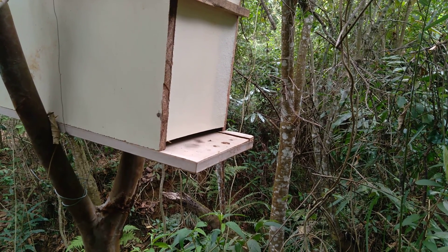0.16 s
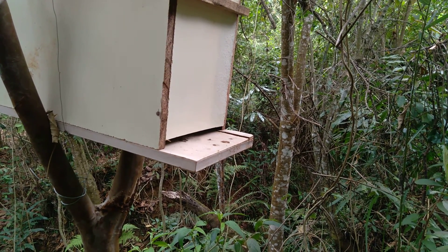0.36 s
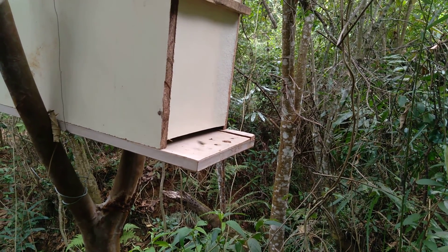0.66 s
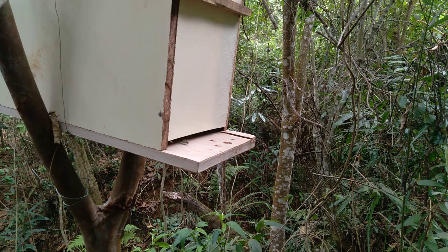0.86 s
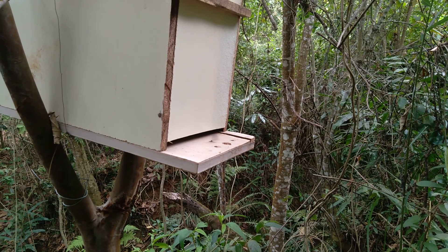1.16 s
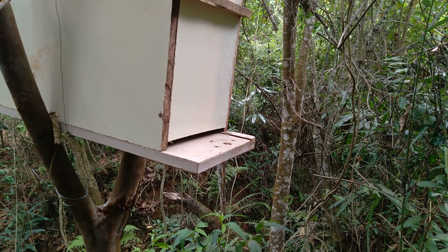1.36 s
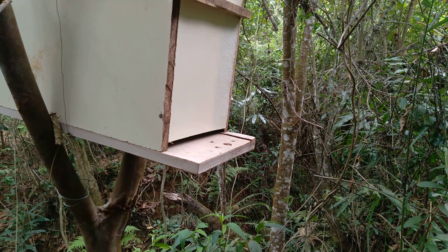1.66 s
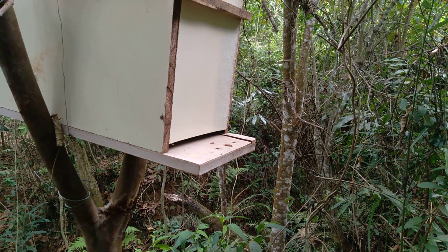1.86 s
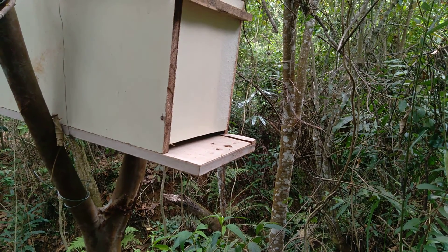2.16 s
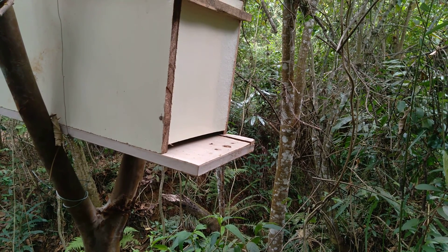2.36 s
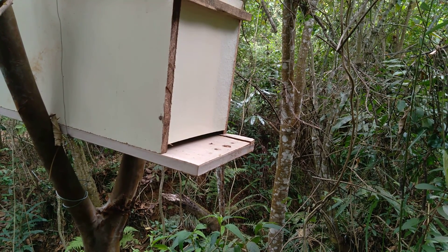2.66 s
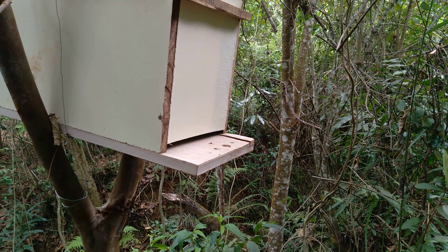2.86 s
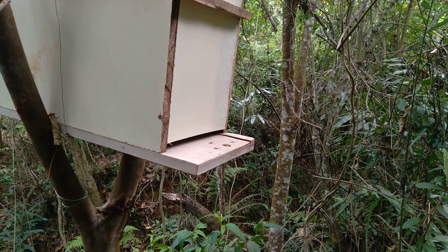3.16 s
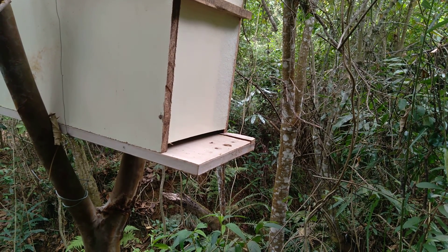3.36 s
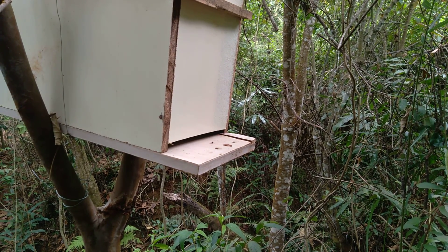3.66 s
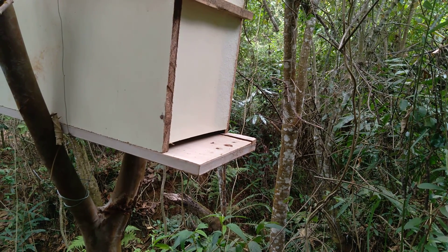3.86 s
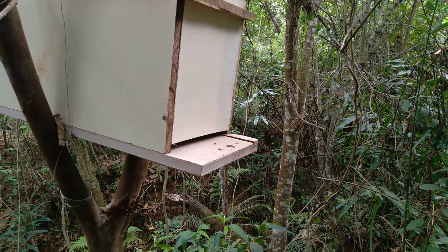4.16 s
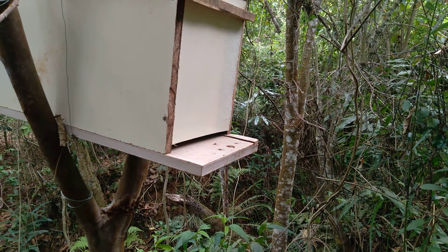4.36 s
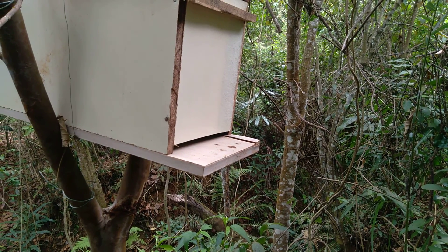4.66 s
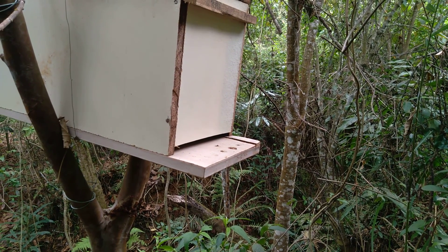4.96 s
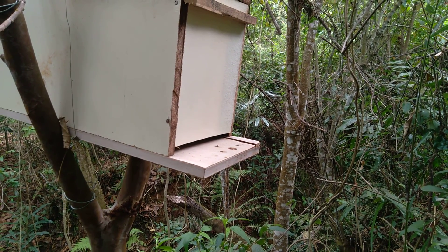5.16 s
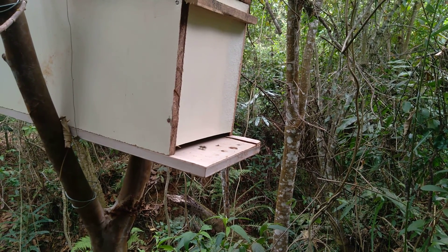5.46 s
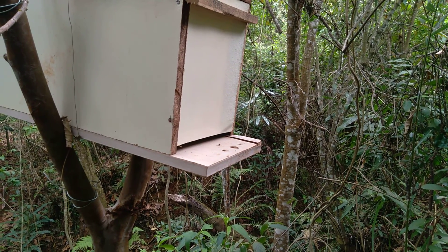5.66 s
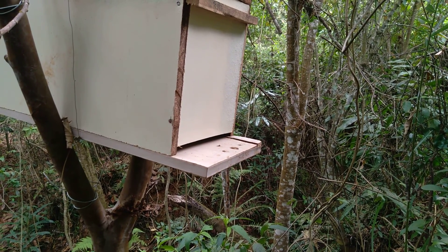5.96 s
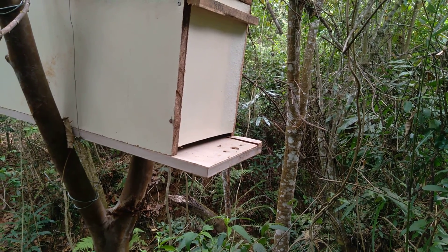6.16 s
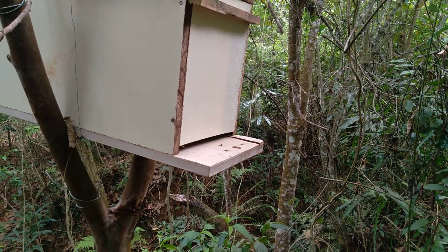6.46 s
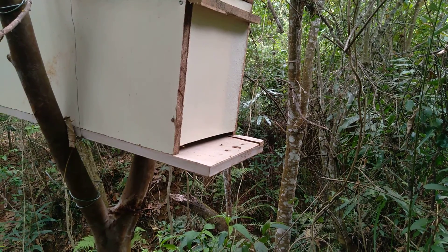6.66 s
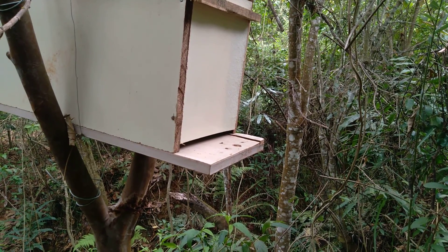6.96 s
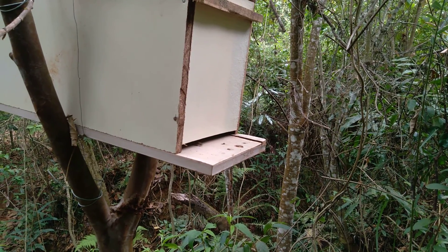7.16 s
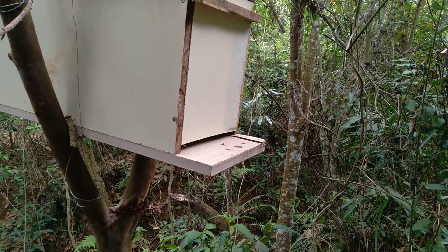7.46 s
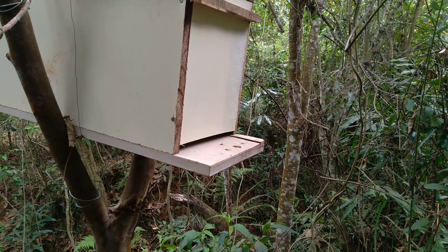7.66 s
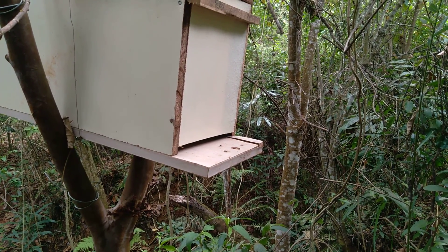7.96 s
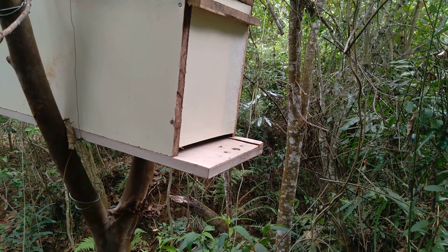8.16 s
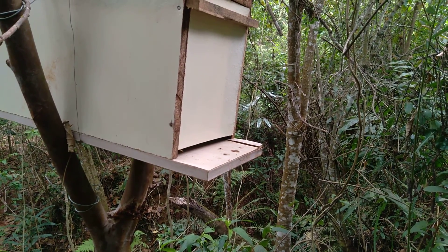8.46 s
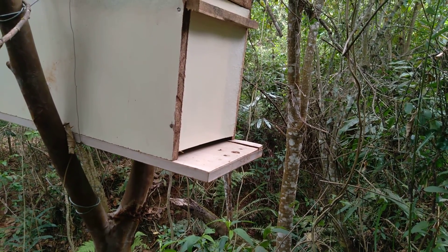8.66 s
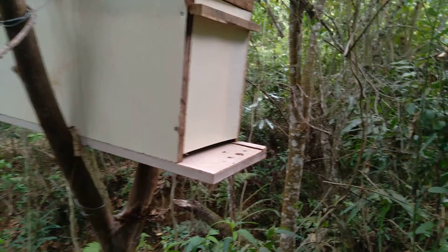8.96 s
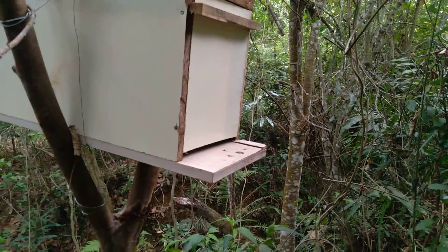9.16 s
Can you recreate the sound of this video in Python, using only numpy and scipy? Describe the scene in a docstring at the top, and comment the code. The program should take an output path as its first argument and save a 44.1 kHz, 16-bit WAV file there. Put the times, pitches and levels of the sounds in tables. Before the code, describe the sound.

Cicadas shrill in a dense, throbbing metallic chorus in woodland, with harsh rasping bursts, a faint low insect hum and tiny drip-like pips.

```python
"""Cicadas shrill in dense woodland around a beehive: tymbal click trains ring body resonances.
One near singer throbs on a steady beat, a higher one ends on a held note, a lower one flexes irregularly.
A far chorus swells behind held notes; rasping calls, bursts of rib clicks, glide up and break in.
Below lie a coloured-noise hum with wingbeats, rounded sine pips like drips, and gliding bird notes.
Filtered noise makes the air, rustles, knocks, a late whine and stuttering phrases."""
import sys
import numpy as np
from scipy import signal
from scipy.fft import rfft, irfft, next_fast_len
from scipy.io import wavfile
from scipy.ndimage import uniform_filter1d

SR = 44100
rng = np.random.default_rng(int(sys.argv[2]) if len(sys.argv) > 2 else 0)


def bounce(signal):
    """Save signal as a 16-bit WAV file at the path given by the first command-line argument."""
    frames = np.transpose(np.atleast_2d(signal))
    limited = np.clip(frames, -1, 1)
    pcm = np.round(limited * 32767).astype(np.int16)
    wavfile.write(sys.argv[1], SR, pcm)


N = 411453
T = np.arange(N) / SR
# Table levels are before the gain_db of the function that plays them.


def from_db(db):
    """Decibels to amplitude gain."""
    return np.exp(np.asarray(db) * (np.log(10) / 20))


def rms_one(x):
    """Scale to rms 1."""
    return x / np.sqrt(np.mean(np.abs(x) ** 2) + 1e-20)


def in_time(rows):
    """Interpolate each column of a curve, sample by sample."""
    s, *columns = np.transpose(rows)
    return [np.interp(T, s, c) for c in columns]


def during(rows):
    """A soft-edged gate, open while a curve lasts."""
    is_open = (T >= rows[0][0]) & (T <= rows[-1][0] + .02)
    return uniform_filter1d(1.0 * is_open, size=2500)


def drift(rate_hz, size=N):
    """Slow random wander of spread 1, linear between knots."""
    knots = rng.standard_normal(int(rate_hz * size / SR) + 4)
    return np.interp(T[:size] * rate_hz, np.arange(len(knots)), rms_one(knots))


def coloured(x, spectrum):
    """Weight a steady sound by a spectrum; rms 1."""
    hz, db = np.transpose(spectrum)
    size = next_fast_len(N)
    log_f = np.log(np.arange(size // 2 + 1) * SR / size + 1e-3)
    weight_db = np.interp(log_f, np.log(hz), db, left=-90, right=-90)
    return rms_one(irfft(rfft(x, size) * from_db(weight_db), size)[:N])


def noise(spectrum):
    """Steady noise of a given colour."""
    return coloured(rng.standard_normal(N), spectrum)


def tymbal(rate_hz, wander, uneven_db, polarity=1, size=N):
    """One click per buckling; with polarity -1 the in and out strokes have opposite signs."""
    step = rate_hz * (1 + wander * drift(25, size=size)) / SR
    turns = np.cumsum(step) + rng.random()
    at = np.flatnonzero(np.diff(np.floor(turns))) + 1
    late = turns[at] % 1 / step[at]  # sub-sample timing
    strength = from_db(uneven_db * rng.uniform(-2.75, 1, size)[at])
    strength = strength * np.sign(polarity) ** np.arange(len(at))
    clicks = np.zeros(size)
    clicks[at - 1], clicks[at] = strength * late, strength * (1 - late)
    return clicks


def body(clicks, hz, width_hz, order=3):
    """A resonance whose centre may move; complex, so that its square is its overtone."""
    carrier = np.exp(2j * np.pi * np.cumsum(hz + np.zeros(len(clicks))) / SR)
    lowpass = signal.butter(order, width_hz / 2, fs=SR, output="sos")
    return signal.sosfilt(lowpass, clicks * carrier.conj() + 1e-18) * carrier


def song(clicks, modes):
    """Clicks ring the resonances of a hollow abdomen."""
    return sum(from_db(db) * body(clicks, hz, width_hz).real for hz, width_hz, db in modes)


def foliage(x, wet_db, t60=0.45):
    """Trunks and leaves scatter a sound into a short dense tail."""
    t = T[:SR // 2]
    tail = rng.standard_normal(len(t)) * from_db(-60 * t / t60) * (t > .004)
    return x + from_db(wet_db) * signal.oaconvolve(x, tail / np.linalg.norm(tail))[:len(x)]


def patchy(x, spread_db, size):
    """Neighbouring pitches fade in and out together, in patches some frequency bins tall; rms 1."""
    spectra = signal.stft(x, nperseg=1024)[2]
    field = rng.standard_normal(spectra.shape)
    for _ in range(2):
        field = uniform_filter1d(uniform_filter1d(field, size=6, axis=1), size=size, axis=0)
    patch_gain = from_db(spread_db * np.minimum(rms_one(field), 1))
    return rms_one(signal.istft(spectra * patch_gain, nperseg=1024)[1][:N])


def slack(first_s, beat_s, snap, duty):
    """How far a throbbing singer has relaxed: near 0 for a share of each beat, then quickly near 1."""
    beat = np.cos(2 * np.pi * (T - first_s) / beat_s)
    return .5 - .5 * np.tanh(snap * (beat - np.cos(np.pi * duty)))


def flexes(rows, half_s):
    """A rounded swell for each throb, and the time from the nearest crest (0 between throbs)."""
    s, db = np.transpose(rows)
    nearest = np.searchsorted((s[1:] + s[:-1]) / 2, T)
    since = T - s[nearest]
    swell = uniform_filter1d(from_db(db[nearest]) * np.exp(-.5 * (since / half_s) ** 2), size=500)
    return swell, uniform_filter1d(since * (np.abs(since) < 2 * half_s), size=1500)


# Throb: t/s, crest level/dB, depth/dB
LEAD_THROB = [(0, -45, -3), (.33, -34, 7.5), (.5, -37.5, 5.5), (.85, -34.5, 10.5), (1.05, -37.5, 5),
              (1.8, -34.5, 7), (4.9, -33, 5.5), (6.1, -30.5, 5), (7.6, -31.5, 2), (8.0, -41.5, -5.5),
              (8.55, -41, -6.5), (9.0, -33, -3)]
# Abdomen resonances: f/Hz, width/Hz, level/dB
LEAD_MODES = [(3893, 356, -7.5), (4566, 425, 6), (5104, 190, 0.5), (5310, 120, -4), (5705, 330, -15.5),
              (6305, 70, -9), (7045, 200, -7), (7855, 370, -3)]
# Tymbal speed, slowing a little as it tires: t/s, clicks/Hz
LEAD_CLICK_RATE = [(0, 251.8), (6.0, 252.0), (7.3, 251.5), (8.8, 250.9)]
# Deep resonance opening in stronger throbs: t/s, level/dB
LEAD_DEEP_OPENINGS = [(.28, -51), (.65, -47), (1.02, -55), (1.43, -45.5), (1.83, -46), (2.17, -54),
                      (2.53, -54), (2.64, -47), (2.95, -59), (3.42, -50.5), (3.91, -51), (4.13, -47),
                      (4.38, -51), (4.6, -47), (4.82, -49), (5.04, -48), (5.41, -49), (5.72, -51),
                      (6.18, -49), (6.5, -51), (7.25, -48), (7.44, -49)]
LEAD_FIRST_S, LEAD_BEAT_S = .22, .395


def lead_cicada(gain_db=0.3, snap=3.2, duty=0.43, deep_hz=3545, deep_width_hz=150, deep_half_s=.04):
    """A clean, close, throbbing buzz on a steady beat; a deep resonance opens in the stronger throbs."""
    crest_db, depth_db = in_time(LEAD_THROB)
    rate_hz, = in_time(LEAD_CLICK_RATE)
    sag_db = depth_db * slack(LEAD_FIRST_S, LEAD_BEAT_S, snap, duty)
    clicks = tymbal(rate_hz, wander=.003, uneven_db=2.2)
    buzz = patchy(foliage(song(clicks, LEAD_MODES), wet_db=-11), spread_db=2.5, size=6)
    deep_clicks = tymbal(rate_hz, wander=0.012, uneven_db=2.5)
    deep = rms_one(body(deep_clicks, deep_hz, deep_width_hz, order=4).real)
    opening, _ = flexes(LEAD_DEEP_OPENINGS, deep_half_s)
    return from_db(crest_db + gain_db - sag_db) * buzz + opening * deep


# Held note, at last without a break: t/s, level/dB
HIGH_HELD = [(0, -58), (2.4, -52), (4.5, -50), (5.6, -42), (5.9, -37), (6.3, -36.5), (7.1, -34),
             (7.5, -36.5), (7.8, -34), (8.2, -33), (9.33, -33)]
# Abdomen resonances: f/Hz, width/Hz, level/dB
HIGH_MODES = [(6595, 440, -1), (7080, 140, -2), (7440, 280, 1), (7570, 170, 1), (8010, 210, 3),
              (8278, 98, -5.5)]
# Throbs: t/s, level/dB
HIGH_FLEXES = [(.02, -38.5), (.24, -40), (.43, -39.5), (.64, -33), (.84, -27.5), (1.05, -32), (1.25, -33),
               (1.45, -37), (1.67, -39.5), (1.87, -38), (2.1, -36.5), (2.29, -33), (2.53, -38),
               (2.73, -37.5), (2.96, -36.5), (3.13, -40.5), (3.39, -39.5), (3.56, -39.5), (3.76, -39),
               (3.98, -43.5), (4.18, -38.5), (4.4, -39.5), (4.62, -35.5), (4.83, -38.5), (5.03, -38),
               (5.25, -37), (5.44, -37), (5.67, -39)]


def high_cicada(gain_db=-0.5, half_s=0.049, slide_hz_per_s=1200, stray_hz=70):
    """A smaller, faster singer clicks on both strokes; resonances stray and rise through each throb."""
    held_db, = in_time(HIGH_HELD)
    swell, since = flexes(HIGH_FLEXES, half_s)
    clicks = foliage(tymbal(290.3, wander=.0024, uneven_db=3.0, polarity=-1), wet_db=-4)
    slide_hz = slide_hz_per_s * since
    modes = [(hz + slide_hz + stray_hz * drift(9), width_hz, db) for hz, width_hz, db in HIGH_MODES]
    buzz = patchy(song(clicks, modes), spread_db=5.5, size=6)  # overtones flicker
    return from_db(gain_db) * np.hypot(swell, from_db(held_db)) * buzz


# Note held between flexes: t/s, level/dB, resonance f/Hz
LOW_NOTE = [(0, -63, 3900), (3.1, -50, 3930), (3.7, -38, 3920), (6.5, -42, 3794), (7.9, -42, 4160),
            (9.33, -46, 4150)]
# Flexes of the abdomen: t/s, level/dB
LOW_FLEXES = [(0.261, -31.5), (0.399, -31), (.66, -31), (.79, -36), (1.05, -32), (1.25, -37), (1.46, -30),
              (1.679, -28.5), (1.895, -29), (2.11, -38.5), (2.34, -29.5), (2.57, -28.5), (2.75, -32.5),
              (3.0, -34.5), (3.22, -35), (3.4, -32.5), (3.7, -35), (3.93, -36.5), (4.17, -29.5),
              (4.38, -35), (4.611, -32.5), (4.82, -37), (5.211, -32), (5.41, -26.5), (5.73, -32.5),
              (5.99, -32.5), (6.199, -29), (6.489, -33), (6.979, -38), (7.439, -32), (7.64, -31),
              (8.05, -27.5), (8.4, -42), (9.0, -27)]


def low_cicada(gain_db=-6.0, half_s=0.04, slide_hz_per_s=1000):
    """Each flex swells out of a held note, and the resonance slides up through it."""
    held_db, hz = in_time(LOW_NOTE)
    swell, since = flexes(LOW_FLEXES, half_s)
    clicks = foliage(tymbal(125.9, wander=0.007, uneven_db=5.5), wet_db=8)
    buzz = rms_one(body(clicks, hz + slide_hz_per_s * since, width_hz=367, order=4).real)
    return from_db(gain_db) * np.hypot(swell, from_db(held_db)) * buzz


# Middle-distance cicadas: start t/s, end t/s, clicks/Hz, resonance f/Hz, width/Hz, level/dB
HELD_SINGERS = [(0, .28, 250.2, 4660, 260, -36), (.98, 1.3, 250.5, 4770, 150, -41),
                (1.5, 3.6, 252.0, 5290, 110, -48), (2.8, 9.33, 248.0, 4400, 260, -45),
                (4.2, 7.8, 244.8, 3950, 200, -47), (6.2, 7.7, 253.9, 5200, 300, -42),
                (6.5, 9.33, 202.5, 4050, 450, -42), (7.7, 9.33, 222.6, 5060, 400, -38.5),
                (8.65, 9.33, 269.8, 4900, 420, -38), (6.7, 9.33, 239.2, 7180, 200, -41),
                (7.8, 9.33, 246.8, 7650, 600, -38)]


def held_notes(gain_db=-1.5, fade_s=0.099):
    """Steady tymbals ring narrow bodies, so each singer adds a few clean lines."""
    out = np.zeros(N)
    for start, end, rate_hz, hz, width_hz, db in HELD_SINGERS:
        gate = np.clip(np.minimum(T - start, end - T) / fade_s + 1, 0, 1)
        clicks = tymbal(rate_hz, wander=.0016, uneven_db=2)
        out += gate * from_db(db + gain_db) * rms_one(body(clicks, hz, width_hz, order=6).real)
    return out


# Swell: t/s, level/dB
CHORUS_SWELL = [(0, -52), (.85, -53), (1.4, -51), (2.0, -52), (3.3, -50.5), (5.5, -46.5), (7.2, -41),
                (8.0, -39), (8.5, -39), (9.0, -37)]
# Tymbal speed of each singer: clicks/Hz
CHORUS_CLICK_RATES = [235.5, 263.6, 288.0, 279.2, 230.5]
# Colour: f/Hz, level/dB per Hz
CHORUS_SPECTRUM = [(2600, -55), (3150, -38.5), (3500, -17.5), (3750, -7.5), (4300, -3), (4900, -0.5),
                   (5200, -1), (5450, -7), (5650, -1.5), (6000, -20.5), (6500, -11), (8000, -18.5),
                   (8700, -16), (9100, -42.5), (11500, -62)]


def chorus(gain_db=6.5):
    """Far singers, each at its own speed, blurred by the wood."""
    level_db, = in_time(CHORUS_SWELL)
    clicks = sum(tymbal(rate_hz, wander=.0023, uneven_db=3) for rate_hz in CHORUS_CLICK_RATES)
    blurred = coloured(foliage(clicks, wet_db=2.0), CHORUS_SPECTRUM)
    return from_db(level_db + gain_db) * patchy(blurred, spread_db=3.5, size=5)


def fading(x):
    """On many paths through the trees, narrow patches of the shrill cancel and return."""
    return np.std(x) * patchy(x, spread_db=2.2, size=4)


# Still air: f/Hz, level/dB per Hz
AIR_SPECTRUM = [(15, -41), (25, -18), (70, -9.5), (153, 0), (313, -21), (397, -32), (579, -22), (1090, -24),
                (1630, -18), (2900, -28.5), (3770, -54), (6380, -120)]
# Hiss: f/Hz, level/dB per Hz
HISS_SPECTRUM = [(2000, -19.5), (3000, 0), (9000, 6), (11000, -1), (13000, -5), (16000, -7.5)]


def air(air_db=-63.0, hiss_db=-64.0):
    """Steady low-weighted noise of still air, and a high hiss."""
    return from_db(air_db) * noise(AIR_SPECTRUM) + from_db(hiss_db) * noise(HISS_SPECTRUM)


# Swells: t/s, bass level/dB, upper level/dB
HUM_LEVELS = [(0.0, -60.5, -60), (0.24, -53.5, -47), (0.36, -78, -59), (0.75, -51.5, -44.5),
              (0.93, -47.5, -64), (1.08, -47.5, -54), (1.26, -51, -75), (1.41, -62, -42.5),
              (1.59, -46, -47.5), (2.04, -60, -47), (2.22, -48.5, -57), (2.45, -45.5, -43),
              (2.7, -41, -36.5), (2.9, -41, -36), (3.05, -43.5, -49), (3.3, -45.5, -53.5),
              (3.69, -60, -62.5), (4.0, -46.5, -40.5), (4.22, -47, -39.5), (4.5, -44, -58.5),
              (4.86, -55, -65), (6.06, -57, -63), (6.12, -59.5, -84), (6.78, -49.5, -51),
              (6.93, -46.5, -55), (7.2, -44.5, -40), (7.62, -41, -57.5), (7.68, -41.5, -45.5),
              (7.86, -44.5, -55), (8.25, -43, -41), (8.43, -45, -52.5), (8.55, -47.5, -40.5),
              (9.06, -48.5, -66), (9.3, -43.5, -65)]
# Bass colour: f/Hz, level/dB per Hz
HUM_BASS_SPECTRUM = [(30, -40), (52, -17.5), (80, -15.5), (105, -5), (135, 4), (200, -1), (290, -4.5),
                     (370, -15.5), (480, -56)]
# Upper colour: f/Hz, level/dB per Hz
HUM_UPPER_SPECTRUM = [(180, -14.5), (290, 10.5), (400, 5), (470, -1), (570, -4.5), (660, -22.5), (800, -24)]


def hum(bass_db=-1.57, upper_db=-5.5, wing_hz=141, wing_share=0.29):
    """A lumpy rumble with a trace of wavering wingbeats; bass and upper parts have their own swells."""
    bass_level_db, upper_level_db = in_time(HUM_LEVELS)
    wings = rms_one(sum(tymbal(wing_hz, wander=.08, uneven_db=7.5) for _ in range(3)))

    def part(spectrum):
        """Wingbeats in noise, coloured and patchy."""
        return patchy(coloured(wing_share * wings + rng.standard_normal(N), spectrum), spread_db=4.5, size=2)

    bass, upper = part(HUM_BASS_SPECTRUM), part(HUM_UPPER_SPECTRUM)
    return from_db(bass_level_db + bass_db) * bass + from_db(upper_level_db + upper_db) * upper


# Clearest pips: t/s, peak level/dB, f/Hz
CLEAR_PIPS = [(.072, -51, 1305), (.12, -48.5, 1326), (.332, -56, 1640), (.368, -51, 1890),
              (1.075, -51, 803), (1.202, -46.5, 2045), (1.225, -57, 2480), (1.315, -40, 1995),
              (1.343, -43, 1860), (1.577, -37.5, 1282), (1.621, -52, 1430), (1.83, -55.5, 1324),
              (1.89, -53, 1555), (2.04, -54, 1340), (2.272, -54.5, 1590), (2.386, -47.5, 1360),
              (3.453, -47.5, 1360), (3.74, -46.5, 1650), (3.755, -50, 2035), (3.932, -45, 1300),
              (4.033, -44.5, 1254), (4.114, -51, 1280), (4.22, -48, 1400), (4.29, -55, 1100),
              (4.52, -49, 1260), (4.463, -50.5, 1850), (4.581, -45.5, 1760), (4.661, -39.5, 1403),
              (4.697, -48, 2080), (4.745, -44.5, 1300), (4.77, -47, 1727), (4.865, -46, 1286),
              (5.004, -48.5, 2130), (5.213, -33, 1740), (5.235, -46, 2060), (5.25, -41, 1820),
              (5.27, -51, 2100), (5.763, -47, 1270), (6.019, -36.5, 1274), (6.07, -38.5, 1244),
              (6.11, -55, 1270), (6.218, -48, 1293), (6.25, -48.5, 1303), (6.283, -46, 2234),
              (6.305, -48.5, 1315), (6.52, -48.5, 742), (6.693, -47, 1940), (6.823, -46, 1285),
              (6.935, -46, 1747), (7.211, -47, 1234), (7.702, -46.5, 1172), (8.156, -46, 1330),
              (8.245, -43.5, 1250), (8.344, -49, 1246), (8.405, -45, 1807), (8.58, -48, 2030),
              (8.778, -44.5, 1850), (8.944, -45.5, 1470), (8.973, -41.5, 1286), (9.005, -46, 1310)]


def pips(gain_db=-2.0, faint_db=-59, spread_db=3.0, rise_s=0.0088, rough=0.64, count=150):
    """Short rounded, slightly rough sine notes, clear ones among many faint at random times."""
    chance = rng.random((count, 2))
    faint_s = chance[:, 0] * T[-1]
    faint_levels_db = faint_db + spread_db * rng.standard_normal(count)
    faint_hz = np.interp(chance[:, 1], [0, .1, .5, 1], [750, 1200, 1500, 2300])
    out, t = np.zeros(N + SR), T[:SR // 16]
    shape = (t / rise_s * np.exp(1 - t / rise_s)) ** 3
    for s, db, hz in np.vstack([CLEAR_PIPS, np.c_[faint_s, faint_levels_db, faint_hz]]):
        at = max(int((s - rise_s / 2) * SR), 0)
        out[at:][:len(t)] += from_db(db + gain_db) * shape * np.sin(2 * np.pi * hz * t)
    return foliage(out[:N] * (1 + rough * drift(350)), wet_db=-7.5, t60=0.43)


RASP_RIBS, RASP_RIB_S = 5, .0033


def ribs(bursts_hz, loss_db, size):
    """Each pull of the muscle buckles a few ribs in turn, the later ones weaker on average."""
    pulls = np.cumsum(rng.normal(1, .05, int(bursts_hz * size / SR))) / bursts_hz
    order = np.arange(RASP_RIBS)
    s = pulls[:, None] + RASP_RIB_S * (order + rng.normal(0, .2, (len(pulls), RASP_RIBS)))
    clicks = np.zeros(size + SR)
    clicks[(s * SR).astype(int)] = from_db(-loss_db * order + 1.6 * rng.standard_normal(s.shape))
    return clicks[:size]


# Calls: start t/s, end t/s, rise/s, full level/dB, full resonance f/Hz, upward glide/Hz, width/Hz,
# bursts/Hz, loss per rib/dB, overtone/dB, scattered share/dB
RASP_CALLS = [(0.365, .93, 0.1, -29.5, 6730, 1400, 1200, 52, 1, -55, 0),
              (0.8, 1.269, .11, -23, 8140, 1090, 3020, 45.6, 0.5, -23.5, 3),
              (1.84, 2.25, 0.19, -24.5, 6810, 850, 1900, 48, 2.5, -56, 2),
              (6.307, 6.977, 0.15, -26, 7455, 500, 2140, 59, 1.5, -61, 1.5),
              (7.655, 8.152, 0.15, -24.5, 7250, 700, 2480, 46, 1.5, -45, 3),
              (8.064, 8.767, 0.059, -26.5, 7095, 700, 2610, 50, 0.5, -51, 9),
              (8.848, 9.34, 0.11, -27, 7260, 700, 2500, 48, 1.5, -52, 2)]
RASP_SWELL_DB, RASP_RELEASE_DB_PER_S = 22, 138
RASP_GLIDE_S, RASP_SAG_HZ_PER_DB = 0.21, 35  # resonance rises at the start, sinks in the release
RASP_CORE_SHARE = 0.32  # low-effort width / full width


def rasps(gain_db=-1.55):
    """Rib bursts start as narrow pulses, widen and glide up as they swell, hold, then drop away."""
    out = np.zeros(N + 2 * SR)
    t = T[:3 * SR // 2]
    for (start, end, rise_s, full_db, full_hz, glide_hz, width_hz,
         bursts_hz, loss_db, overtone_db, wet_db) in RASP_CALLS:
        fade_db = RASP_RELEASE_DB_PER_S * np.maximum(t - (end - start), 0)
        effort = from_db(-RASP_SWELL_DB * np.exp(-t / rise_s) - fade_db)
        hz = full_hz - glide_hz * np.exp(-t / RASP_GLIDE_S) - RASP_SAG_HZ_PER_DB * fade_db
        clicks = ribs(bursts_hz, loss_db, size=len(t))
        core = rms_one(body(clicks, hz, RASP_CORE_SHARE * width_hz, order=4).real)
        ring = rms_one(body(foliage(clicks, wet_db, t60=0.4), hz, width_hz, order=7))
        call = effort * (np.sqrt(1 - effort) * core + np.sqrt(effort) * rms_one(ring.real))
        overtone = from_db(overtone_db) * effort ** 2 * rms_one((ring ** 2).real)
        out[int(start * SR):][:len(t)] += from_db(full_db + gain_db) * (call + overtone)
    return out[:N]


# Faint notes: t/s, length/s, level/dB, f/Hz, glide/(Hz/s)
BIRD_NOTES = [(0.553, 0.026, -53, 2640, 2000), (0.828, 0.12, -58.5, 2330, -1500),
              (2.072, 0.15, -56, 2476, -500), (3.458, 0.059, -54, 1554, 6002.5),
              (3.678, 0.065, -55.5, 2450, 2), (3.952, 0.12, -58.5, 2466, 0.5), (6.69, 0.085, -58, 2510, -1),
              (8.763, 0.1, -56, 2300, 8)]


def bird(waver=.025):
    """Far, wavering sine notes, some of them gliding."""
    out = np.zeros(N)
    for s, length_s, db, hz, glide_hz_per_s in BIRD_NOTES:
        progress = np.clip((T - s) / length_s, 0, 1)
        pitch_hz = (hz + glide_hz_per_s * length_s * (progress - .5)) * (1 + waver * drift(150))
        out += from_db(db) * np.sin(np.pi * progress) * np.sin(2 * np.pi * np.cumsum(pitch_hz) / SR)
    return foliage(out, wet_db=-6.5)


def brushes(rows):
    """Brief contacts, each a band of noise that dies away."""
    out, t = np.zeros(N + SR), T[:SR // 4]
    for s, db, hz, width_hz, decay_s in rows:
        edges_hz = [max(hz - width_hz / 2, 30), hz + width_hz / 2]
        band = signal.butter(3, edges_hz, "band", fs=SR, output="sos")
        grain = rms_one(signal.sosfilt(band, rng.standard_normal(len(t))))
        envelope = np.exp(-t / decay_s) * (1 - np.exp(-t / 0.002))
        out[int(s * SR):][:len(t)] += from_db(db) * grain * envelope
    return out[:N]


# Leaf contacts: t/s, level/dB, centre f/Hz, width/Hz, decay/s
LEAF_BRUSHES = [(1.335, -48, 2100, 700, 0.011), (1.475, -55, 790, 488, 0.028), (1.6, -58, 1470, 613, 0.07),
                (4.5, -62, 1600, 700, .05), (5.262, -47.5, 2150, 600, 0.019), (5.63, -59, 1330, 900, 0.051),
                (6.283, -53, 2060, 600, 0.017), (8.03, -64, 1670, 800, 0.044), (9.005, -43, 110, 70, .03)]


def rustles(gain_db=4.0):
    """Soft brushes of leaves: decaying noise bands."""
    return from_db(gain_db) * brushes(LEAF_BRUSHES)


# Twig and wood contacts: t/s, level/dB, centre f/Hz, width/Hz
WOOD_KNOCKS = [(3.942, -45, 740, 500), (3.945, -44.5, 1660, 800), (3.98, -53, 1040, 600),
               (4.035, -48, 1600, 600), (4.43, -54, 840, 400), (4.462, -53, 1300, 1100),
               (5.771, -49.5, 920, 700), (6.695, -56, 2150, 800), (6.91, -56, 2090, 600),
               (6.974, -56, 1650, 600), (7.208, -52, 1700, 1100), (7.92, -60, 1860, 600),
               (8.398, -52, 1700, 900), (8.799, -50.5, 1400, 1110), (8.998, -49, 1300, 1200),
               (9.0, -46, 2800, 600)]


def knocks(gain_db=2.5, decay_s=0.0078):
    """Dry taps of twigs and wood with a little scatter from the trees."""
    taps = brushes([(*row, decay_s) for row in WOOD_KNOCKS])
    return from_db(gain_db) * foliage(taps, wet_db=-8)


# Late thin note: t/s, level/dB, f/Hz
WHINE_NOTE = [(5.6, -53, 3480), (6.4, -43.5, 3396), (6.75, -42.5, 3360), (7.45, -48.5, 3310),
              (7.8, -42.5, 3346), (8.15, -47, 3394), (8.6, -55, 3397), (9.33, -49, 3440)]


def whine(gain_db=-5.0, flicker_db=2.5):
    """A narrow, distant note under the chorus: noise through a moving resonance."""
    level_db, hz = in_time(WHINE_NOTE)
    note = rms_one(body(rng.standard_normal(N), hz, width_hz=60).real)
    return during(WHINE_NOTE) * from_db(level_db + gain_db + flicker_db * drift(10)) * note


# Lower, fainter singer: start t/s, length/s, level/dB, f/Hz
STUTTER_PHRASES = [(5.664, 0.14, -65, 2960), (6.11, 0.29, -66.5, 2930), (6.594, 0.58, -64, 2860),
                   (7.63, 0.29, -60.5, 2890), (7.992, 0.2, -62.5, 2900), (8.37, 0.34, -67, 2940),
                   (8.898, 0.27, -61.5, 2945)]


def stutter(gain_db=4.5, pulses_hz=13, depth_db=7, width_hz=100):
    """Faint, pulsing phrases of narrow noise just below the whine."""
    out = np.zeros(N + SR)
    for s, length_s, db, hz in STUTTER_PHRASES:
        t = T[:int(length_s * SR)]
        pulse = from_db(-depth_db * np.cos(np.pi * pulses_hz * t) ** 2)
        swell = np.abs(np.sin(np.pi * t / length_s)) ** .5 * pulse
        note = rms_one(body(rng.standard_normal(len(t)), hz, width_hz).real)
        out[int(s * SR):][:len(t)] += from_db(db + gain_db) * swell * note
    return out[:N]


def scene():
    """Everything meets at one microphone."""
    shrill = fading(lead_cicada() + high_cicada() + low_cicada() + held_notes() + chorus())
    cicadas = shrill + rasps() + whine() + stutter()
    return np.tile(cicadas + air() + hum() + pips() + bird() + rustles() + knocks(), (2, 1))


def suppressor(x, strength=3.2, depth_db=1.5):
    """Noise suppression: what is weaker than its surroundings in time and pitch is turned down further."""
    spectra = signal.stft(x, nperseg=1024, noverlap=768)[2]
    power = uniform_filter1d(uniform_filter1d(np.abs(spectra) ** 2, size=7, axis=1), size=2, axis=0)
    level_db = 10 * np.log10(np.abs(power) + 1e-16)
    around_db = uniform_filter1d(uniform_filter1d(level_db, size=41, axis=1), size=9, axis=0)
    gain_db = np.clip(strength * (level_db - around_db), -depth_db, 0)
    return signal.istft(spectra * from_db(gain_db), nperseg=1024, noverlap=768)[1][:N]


CUTOFF_HZ = 15750


def record(dry):
    """One microphone on two equal channels, noise suppression, and a steep cut at the top."""
    lowpass = signal.ellip(10, .1, 80, CUTOFF_HZ, fs=SR, output="sos")
    return np.tile(signal.sosfilt(lowpass, suppressor(dry[0])), (2, 1))


dry = scene()
out = record(dry)
bounce(out)
```